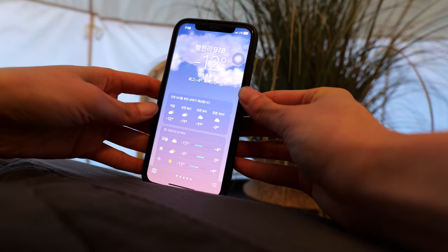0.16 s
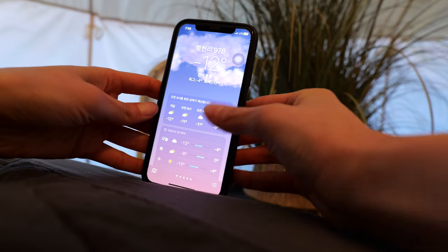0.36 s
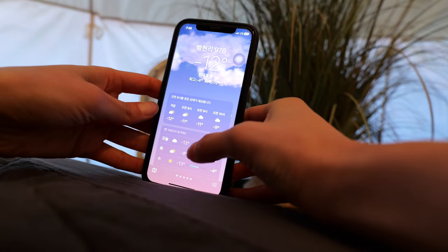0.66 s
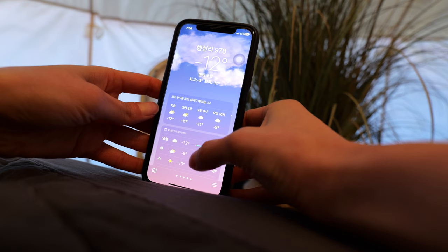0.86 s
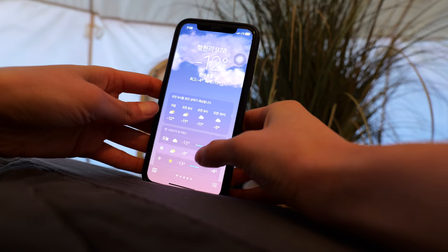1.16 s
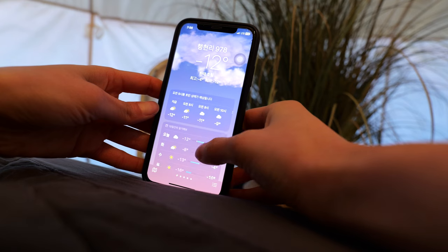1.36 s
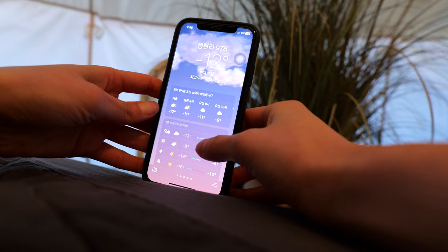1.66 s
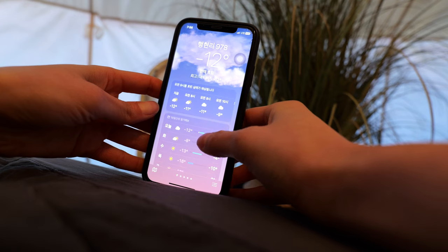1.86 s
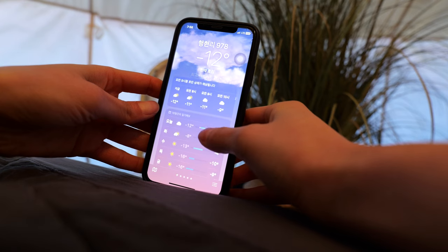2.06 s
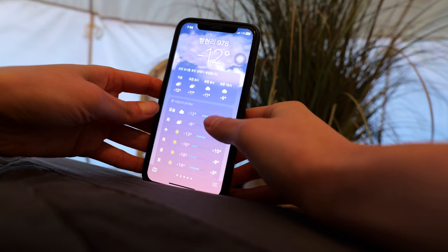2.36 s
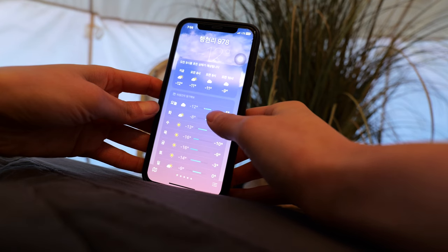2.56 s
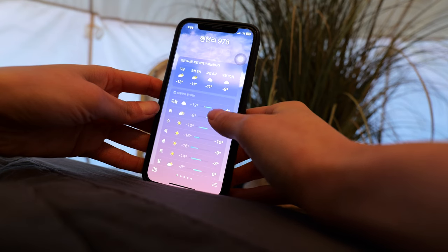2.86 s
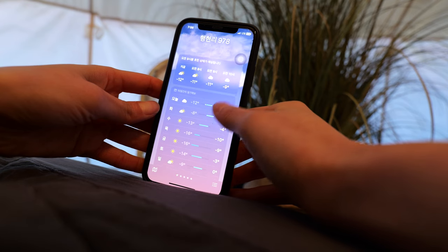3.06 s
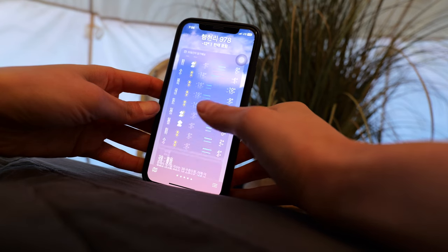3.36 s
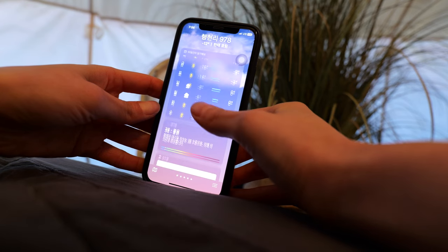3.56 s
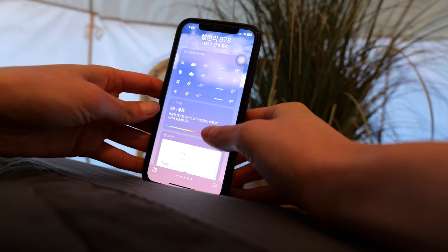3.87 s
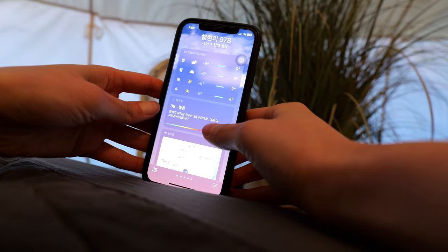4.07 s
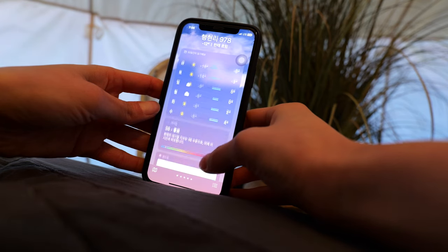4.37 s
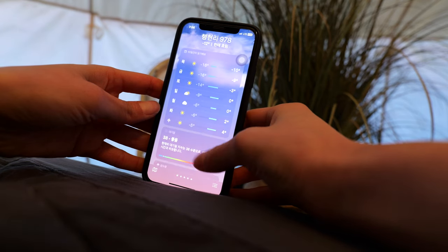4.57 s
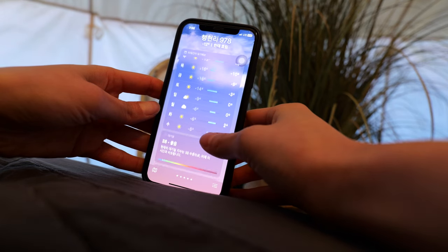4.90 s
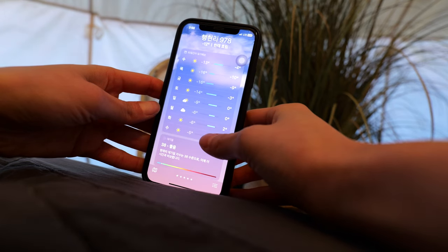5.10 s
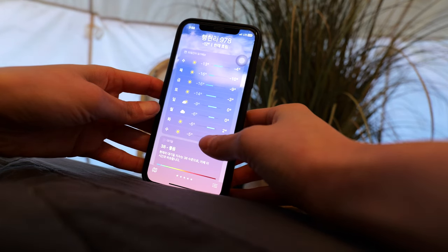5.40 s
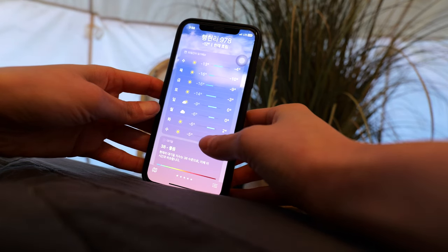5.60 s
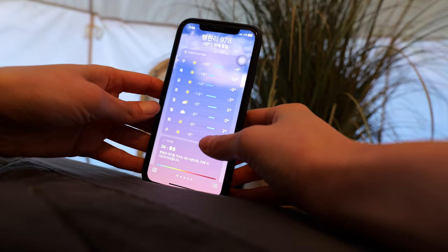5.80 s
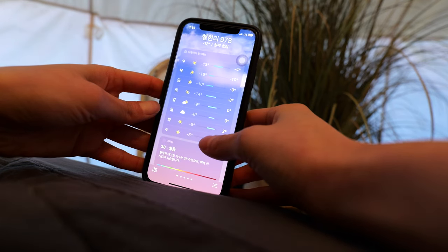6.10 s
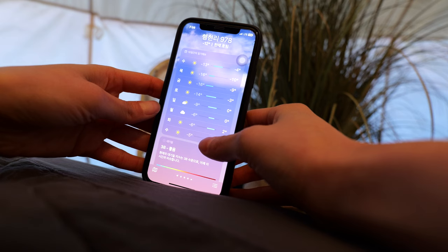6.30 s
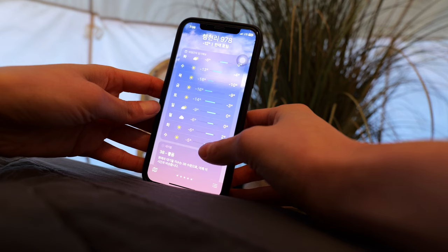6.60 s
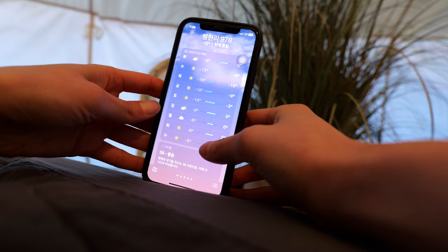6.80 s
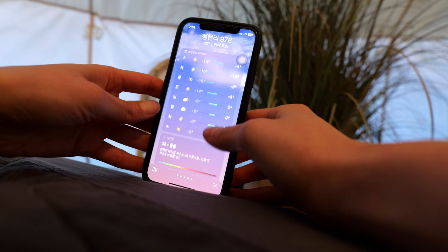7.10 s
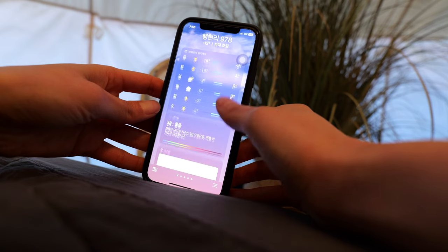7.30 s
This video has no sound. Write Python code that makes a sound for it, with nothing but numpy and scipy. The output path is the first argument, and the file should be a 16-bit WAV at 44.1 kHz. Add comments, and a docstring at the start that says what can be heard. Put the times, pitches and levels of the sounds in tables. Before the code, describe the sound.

From 0 to about 7.5 seconds, a small compressor and fan hum quietly and continuously inside a tent, already running at the start and never stopping. The strongest tone is a deep bass drone around 155 hertz, with weight near 80 and 310 hertz; the lowest part throbs softly and evenly about three times a second. Above it sit a faint mains buzz, slightly fluttering side tones and a thin whine between roughly 500 and 1600 hertz. A soft, dull rush of air fills around the hum, and a very faint hiss spreads wide while the machine stays centred. A tiny dry tick sounds at 0.03 seconds. Barely perceptible noise puffs come near 0.9 and 1.1 seconds, then a minute high tick at 6.8 and two soft puffs around 6.9. Hands scrolling the phone remain practically silent.

```python
"""A steady hum throbs in the bass about three times a second: a small compressor and its fan in a quiet tent.
The compressor's fundamental lies 3 Hz under the fan's second order, so the two beat.
Its odd upper orders whine, and the motor's torque ripple sets weak side tones fluttering beside the low ones.
A faint mains buzz, ringing casing tones and a soft rush of air, shaped from noise, lie around the hum.
Decaying tones and noise bands make a few tiny ticks and soft noise puffs, over a faint wide hiss."""
import sys
import numpy as np
from scipy import signal
from scipy.fft import rfft, irfft
from scipy.io import wavfile

SR = 44100
rng = np.random.default_rng(int(sys.argv[2]) if len(sys.argv) > 2 else 0)


def waveform_to_disk(signal):
    """Save audio, clipped to [-1, 1], as 16-bit WAV at the path in sys.argv[1]."""
    frames = np.transpose(np.atleast_2d(signal))
    scaled = np.clip(frames, -1, 1) * 32767
    samples = np.round(scaled).astype(np.int16)
    wavfile.write(sys.argv[1], SR, samples)


N = 328545

COMPRESSOR_HZ, FAN_HZ, MAINS_HZ = 77.757, 40.362, 59.995
IN_STEP_S = 0.305  # the moment at which the low orders of each hum crest together
EVEN_DROP_DB = 8  # even orders of the whine lie this far under the odd ones
LOWER_SIDE_DROP_DB = 6  # side tones below their order are weaker than those above
CUTOFF_HZ = 15600

# faint hiss common to both channels: frequency_hz, density_db (dB per Hz)
HISS_DENSITY = [(300, -116), (2500, -113.5), (4000, -114.4), (6000, -115), (10000, -116), (15000, -117.2)]
# faint noise of opposite sign in the two channels: frequency_hz, density_db (dB per Hz)
SIDE_NOISE_DENSITY = [(25, -117), (80, -117), (170, -126), (350, -120), (700, -115.5), (1400, -122),
                      (3000, -120), (6000, -119.3), (15000, -120)]
# rush of moving air: frequency_hz, density_db (dB per Hz)
AIR_DENSITY = [(20, -104), (36, -102), (55, -87), (88, -80.5), (115, -85.5), (180, -79.5), (245, -83.5),
               (290, -82.5), (440, -88.5), (525, -94.5), (610, -89.5), (850, -94.5), (1400, -96),
               (2000, -107.8), (3000, -118)]
# tiny ticks and soft noise puffs: start_s, level_db, pitch_hz, t60_s, noise_share (0-1)
TICKS_AND_PUFFS = [(0.027, -50.5, 2720, 0.025, 0.4), (.915, -65, 1900, .1, .95), (1.09, -66, 2000, .1, .95),
                   (6.7794, -62, 15000, .02, .9), (6.9144, -61, 1880, .08, .95),
                   (6.9394, -63, 2030, .05, .95)]
# mains buzz: order (multiple of the mains frequency), level_db (rms)
MAINS_ORDERS = [(2, -63.5), (4, -75.5), (6, -66), (8, -88)]
# tones of the shaking casing: frequency_hz, level_db (rms)
CASING_TONES = [(300.7, -69), (1437.0, -78.5), (2106.2, -99.3), (5272.1, -101.2)]
# torque ripple: offset (multiple of the mains frequency), lowest_order, highest_order
RIPPLE_SIDE_TONES = [(-2, 4, 6), (2, 1, 7), (4, 1, 6)]
# side tones as the shell radiates them: frequency_hz, level_db (rms)
SHELL_RADIATION = [(195, -69), (272, -73), (335, -72.5), (450, -76), (515, -82.5), (705, -82)]
# fan: order (multiple of its speed), level_db (rms)
FAN_ORDERS = [(1, -75.5), (2, -62.5), (3, -74), (4, -73.5), (7, -72.5)]
# low orders of the compressor: order (multiple of its speed), level_db (rms)
COMPRESSOR_ORDERS = [(1, -62), (2, -52), (3, -64), (4, -59), (5, -85), (6, -63.5)]
# whine of the compressor, drawn through its odd upper orders: frequency_hz, level_db (rms)
WHINE_SPECTRUM = [(544, -75.5), (700, -68.5), (855, -72), (1011, -73.3), (1166, -77.5), (1322, -69.3),
                  (1477, -75), (1633, -82)]


def from_db(db):
    """Decibels are logarithmic: 20 dB is a tenfold amplitude."""
    return 10 ** (np.asarray(db) / 20)


def seconds():
    """Sampling is uniform: the time of every sample."""
    return np.arange(N) / SR


def at_hz(spectrum, hz):
    """Spectral envelope: level in dB, interpolated over log frequency."""
    points_hz, level_db = np.transpose(spectrum)
    return np.interp(np.log(hz), np.log(points_hz), level_db)


def drift(rate_hz):
    """Low-pass filtered chance: a slow random wander of standard deviation 1."""
    step = 200  # samples between coarse points
    pole = np.exp(-2 * np.pi * rate_hz * step / SR)
    coarse = rng.standard_normal(N // step + 1002)
    slow = signal.lfilter([1], [1, -2 * pole, pole * pole], coarse)[1000:]  # drop the filter's run-in
    return np.interp(np.arange(N) / step, np.arange(len(slow)), slow / slow.std())


def steady_noise(density):
    """Spectral shaping: white noise weighted to a density, falling 12 dB per octave beyond its ends."""
    hz = np.transpose(density)[0]
    bins_hz = np.maximum(np.fft.rfftfreq(N, 1 / SR), 1)
    skirts = np.minimum(bins_hz / hz[0], 1) * np.minimum(hz[-1] / bins_hz, 1)
    gain = from_db(at_hz(density, bins_hz)) * skirts ** 2
    white = rfft(rng.standard_normal(N))
    return irfft(white * gain * np.sqrt(SR / 2), N)


def wavering_cosine(cycles, level_db, waver_db, waver_hz):
    """Amplitude modulation: a tone of the given rms whose level wanders slowly in dB."""
    return np.sqrt(2) * from_db(level_db + waver_db * drift(waver_hz)) * np.cos(2 * np.pi * cycles)


def hum(speed_hz, orders, wander_s, waver_db, scatter_hz):
    """Harmonic series: orders share one slightly uneven speed, and each wavers in level."""
    turns = speed_hz * (seconds() - IN_STEP_S + wander_s * drift(1.1))
    out = np.zeros(N)
    for order, level_db in orders:
        # low orders leave the casing in step; its resonances scatter the phase of the higher ones
        lag = rng.uniform(-1, 1) * (order * speed_hz / scatter_hz) ** 2
        out += wavering_cosine(order * turns + lag, level_db, waver_db, waver_hz=2.9)
    return out


def wide_hiss():
    """Sum and difference: a common noise plus a faint noise of opposite sign in the two channels."""
    side = steady_noise(SIDE_NOISE_DENSITY)
    return steady_noise(HISS_DENSITY) + np.array([side, -side])


def air_rush():
    """Broadband flow noise: moving air is heard as a continuous spectrum without pitch."""
    return steady_noise(AIR_DENSITY)


def ticks_and_puffs(width):
    """Exponential decay: a tick is a brief decaying tone; a puff is a noise band around its pitch."""
    out = np.zeros(N)
    for start_s, level_db, pitch_hz, t60_s, noise_share in TICKS_AND_PUFFS:
        age = np.maximum(seconds() - start_s, 0)
        edges_hz = pitch_hz * (1 + width * np.array([-1, 1]))
        band = signal.butter(2, edges_hz, "band", fs=SR, output="sos")
        puff = signal.sosfilt(band, rng.standard_normal(N))
        puff *= 0.5 / puff.std()
        ring = np.sin(2 * np.pi * pitch_hz * age)
        blend = (1 - noise_share) * ring + noise_share * puff
        decay = np.exp(-np.log(1000) * age / t60_s)  # down 60 dB after t60_s
        out += from_db(level_db) * (age > 0) * blend * decay
    return out


def mains_buzz():
    """Periodic excitation: the mains sounds at even multiples of its frequency."""
    return hum(MAINS_HZ, MAINS_ORDERS, wander_s=0.00002, waver_db=0.5, scatter_hz=644)


def casing(waver_db):
    """Resonance: loose panels add faint wavering tones along with the hum."""
    out = np.zeros(N)
    for hz, level_db in CASING_TONES:
        out += wavering_cosine(hz * seconds() + rng.random(), level_db, waver_db, waver_hz=1.5)
    return out


def torque_ripple(waver_db):
    """Modulation: mains ripple in the motor's pull sets side tones beside the low orders; they beat."""
    out = np.zeros(N)
    for offset, lowest, highest in RIPPLE_SIDE_TONES:
        for order in range(lowest, highest + 1):
            hz = order * COMPRESSOR_HZ + offset * MAINS_HZ
            level_db = at_hz(SHELL_RADIATION, hz) - LOWER_SIDE_DROP_DB * (offset < 0)
            out += wavering_cosine(hz * seconds() + rng.random(), level_db, waver_db, waver_hz=1.3)
    return out


def fan():
    """Rotation: the fan sounds at whole multiples of its speed."""
    return hum(FAN_HZ, FAN_ORDERS, wander_s=0.0001, waver_db=0.5, scatter_hz=650)


def whine_orders(first_order, last_order):
    """Spectral envelope: upper orders follow one smooth curve, odd ones strong and even ones weak."""
    orders = []
    for order in range(first_order, last_order + 1):
        even_drop_db = EVEN_DROP_DB * (order % 2 == 0)
        orders.append((order, at_hz(WHINE_SPECTRUM, order * COMPRESSOR_HZ) - even_drop_db))
    return orders


def compressor():
    """Rotation: low orders of the compressor's speed hum and its upper orders whine."""
    orders = COMPRESSOR_ORDERS + whine_orders(first_order=7, last_order=21)
    return hum(COMPRESSOR_HZ, orders, wander_s=0.00004, waver_db=0.54, scatter_hz=650)


def scene():
    """Superposition: machine, air, ticks and puffs sit in the middle; only the hiss has width."""
    background = wide_hiss() + air_rush() + ticks_and_puffs(width=0.1)
    machine = mains_buzz() + casing(waver_db=1.5) + torque_ripple(waver_db=1.0) + fan() + compressor()
    return background + machine


def record(dry):
    """Band limiting: an elliptic low-pass cuts the top steeply."""
    low_pass = signal.ellip(12, 0.1, 80, CUTOFF_HZ, fs=SR, output="sos")  # ripple and stopband in dB
    return signal.sosfilt(low_pass, dry)


dry = scene()
out = record(dry)
waveform_to_disk(out)
```